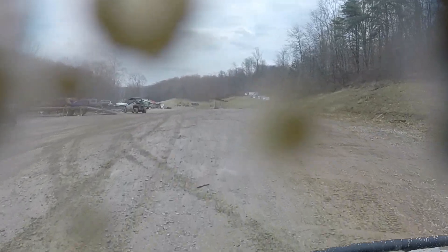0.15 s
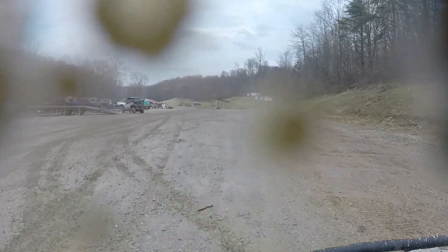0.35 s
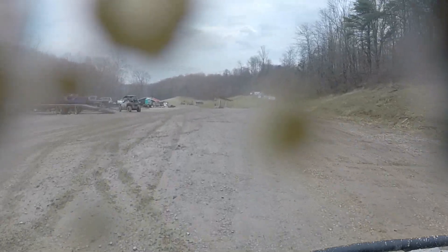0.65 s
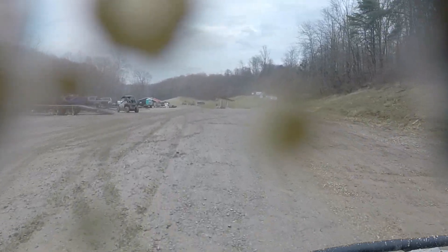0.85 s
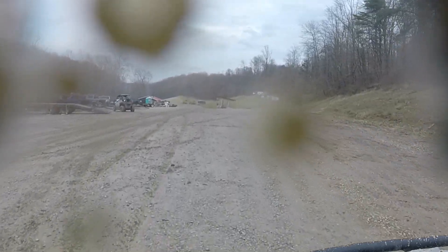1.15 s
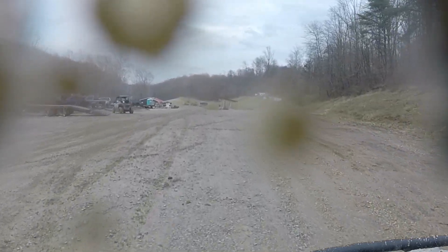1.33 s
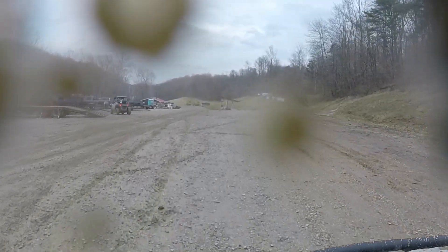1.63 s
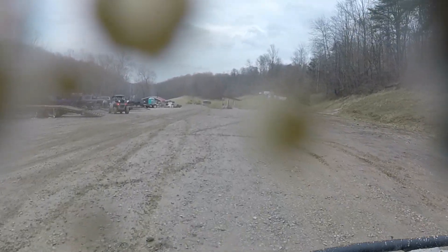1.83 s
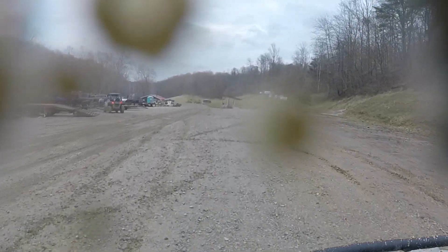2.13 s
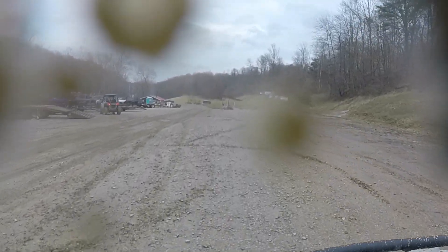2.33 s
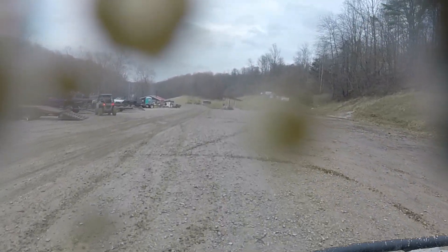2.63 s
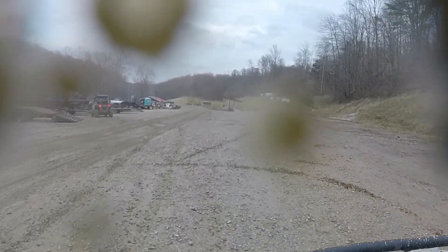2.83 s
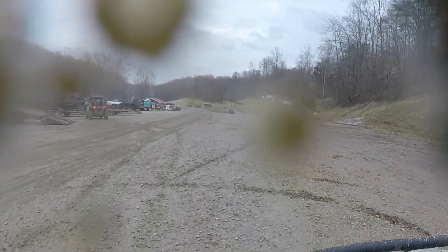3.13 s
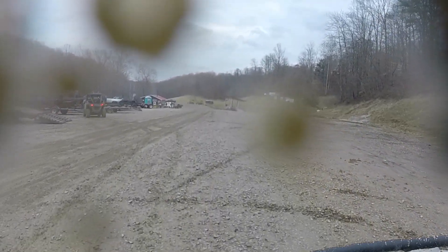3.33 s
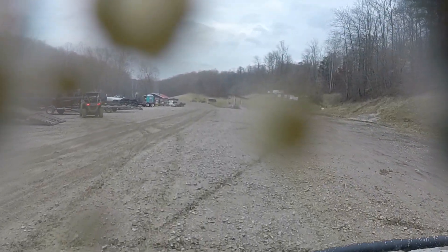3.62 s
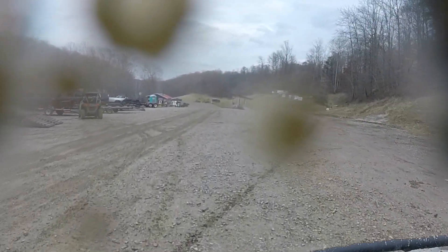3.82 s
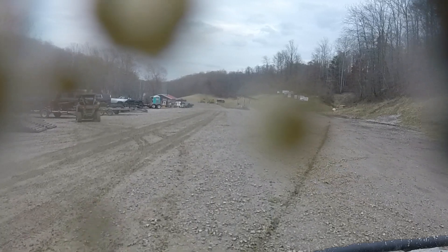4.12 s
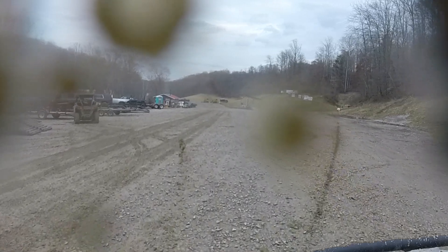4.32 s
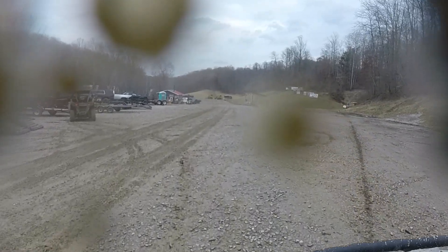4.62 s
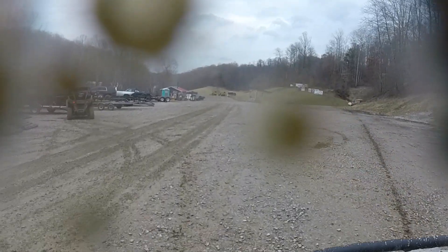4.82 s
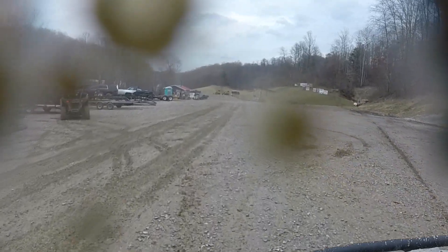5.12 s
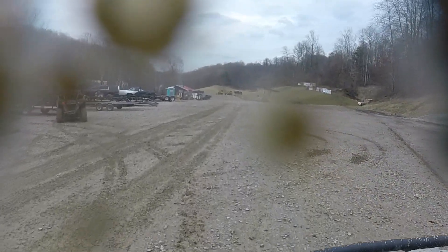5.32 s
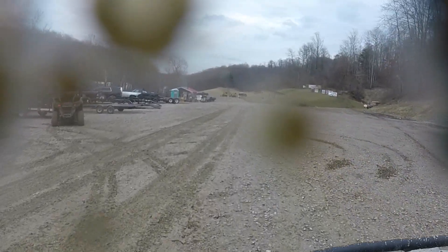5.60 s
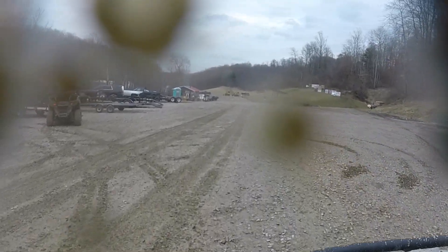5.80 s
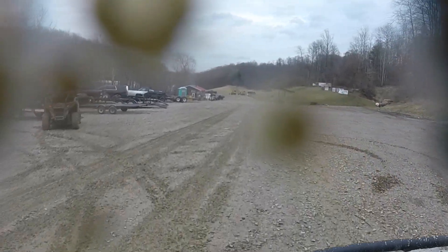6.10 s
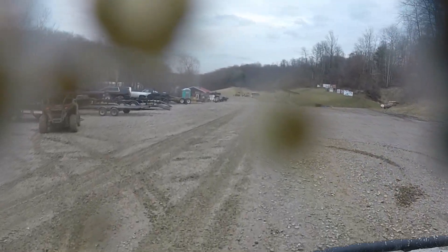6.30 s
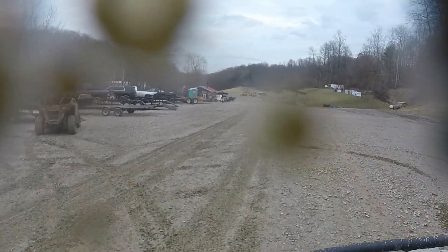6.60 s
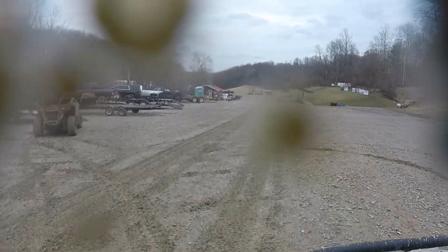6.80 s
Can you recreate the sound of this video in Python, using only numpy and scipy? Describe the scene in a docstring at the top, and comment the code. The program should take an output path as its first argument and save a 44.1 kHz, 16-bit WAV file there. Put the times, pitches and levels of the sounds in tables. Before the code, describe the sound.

Low boomy engine hum sinks in pitch over crunching gravel, with sparse stone knocks growing into a busy rattle of hits and grit.

```python
"""A slowing off-road vehicle on gravel, heard by a small microphone in a closed case on the bodywork.
Its exhaust booms as sines on crankshaft orders; a shaft and a panel add narrow noisy tones, loose metal puffs.
Tyres grind, rumble and crunch as shaped noise and random grains; grit ticks on the bodywork.
Thrown stones ring the modes of the underside, and a gain control ducks after the hardest knocks."""
import sys
import numpy as np
from scipy import signal
from scipy.fft import rfft, irfft, next_fast_len
from scipy.io import wavfile
from scipy.ndimage import uniform_filter1d

SR = 44100
rng = np.random.default_rng(int(sys.argv[2]) if len(sys.argv) > 2 else 0)


def waveform_to_disk(signal):
    """Save audio, clipped to [-1, 1], as 16-bit WAV at the path in sys.argv[1]."""
    frames = np.transpose(np.atleast_2d(signal))
    scaled = np.clip(frames, -1, 1) * 32767
    samples = np.round(scaled).astype(np.int16)
    wavfile.write(sys.argv[1], SR, samples)


N = 306495

# Engine, four firings a turn: t/s, firing rate f/Hz, mean level/dB of the firing order,
# mean level/dB of the crankshaft order above it
ENGINE_COURSE = [(0.0, 125.4, -14.5, -25), (0.08, 125.7, -9, -25.5), (.45, 125.5, -9, -26),
                 (1.39, 123.4, -11, -35), (2.59, 121, -10, -29.5), (3.0, 123, -9, -29),
                 (3.31, 125.1, -9.5, -25), (3.72, 122.4, -12, -36), (4.11, 116.9, -13, -26),
                 (4.45, 109.7, -11.5, -24), (4.62, 105.1, -19.5, -10), (4.8, 98.22, -18.5, -23.5),
                 (5.03, 101.4, -11.5, -15.5), (5.3, 97.57, -23.5, -18.5), (5.54, 94.56, -21, -27),
                 (5.7, 89.43, -26.5, -35), (5.82, 90.84, -15.5, -12.5), (6.0, 89.43, -22, -27),
                 (6.16, 88.1, -12, -24.5), (6.57, 88.25, -19.5, -9), (6.79, 88.46, -35, -15),
                 (6.95, 91.6, -13, -17)]
# Rolling on gravel: t/s, relative grinding level/dB, gain/dB of its part under 600 Hz,
# rumble level/dB, level/dB of the shaken panel
ROLLING_COURSE = [(0, -36.5, 1.5, -26.5, -44.5), (1.4, -38, 1, -23.5, -26.5),
                  (1.8, -34.5, -1.5, -24.5, -27.5), (3.05, -34, -2, -21, -28.5),
                  (3.5, -38.5, 3.5, -26, -41.5), (4.42, -38, -2, -18.5, -29.5), (4.66, -37, -2, -23, -18.5),
                  (4.85, -37, -3, -15.5, -18.5), (5.1, -36.5, -6, -20.5, -24),
                  (5.35, -31.5, -18, -17.5, -16), (5.62, -39, 8, -21, -22), (5.9, -36.5, -1.5, -18.5, -23),
                  (6.2, -35, -5.5, -17.5, -15), (6.5, -36.5, -0.5, -18.5, -12.5),
                  (6.95, -38.5, -3, -21.5, -32)]


def amp(db):
    """Level to amplitude ratio: 20 dB for each factor of ten."""
    return 10 ** (np.asarray(db) / 20)


def evened(x):
    """Normalisation to a root-mean-square value of 1."""
    return x / np.sqrt(np.mean(x ** 2) + 1e-20)


def read(points, hz):
    """Interpolation of a spectrum in level over logarithmic frequency."""
    f, value = np.transpose(points)
    return np.interp(np.log(hz + 1), np.log(f + 1), value)


def columns(rows):
    """Linear interpolation in time: every column after t/s, one value a sample."""
    s, *rest = np.transpose(rows)
    return [np.interp(np.arange(N) / SR, s, c) for c in rest]


def coloured(x, points):
    """Linear filtering: multiplies the spectrum of x by a gain curve of f/Hz, level/dB."""
    size = next_fast_len(len(x))
    gain = amp(read(points, np.fft.rfftfreq(size, 1 / SR)))
    return irfft(rfft(x, size) * gain, size)[:len(x)]


def wander(top_hz):
    """Low-pass random process: Gaussian roll-off around top_hz, rms 1."""
    count, rate_hz = 4096, 500
    steps = rng.standard_normal(count)
    hz = np.fft.rfftfreq(count, 1 / rate_hz)
    slow = irfft(rfft(steps) * np.exp(-(hz / top_hz) ** 2))
    return evened(np.interp(np.arange(N) / SR, np.arange(count) / rate_hz, slow))


def tone(hz, rough, rough_hz):
    """Phase integration of the curve hz: a sine mixed with narrow-band noise around it, rms near 1."""
    phase = 2 * np.pi * np.cumsum(hz) / SR + 2 * np.pi * rng.random()
    fuzz = wander(rough_hz) * np.cos(phase) + wander(rough_hz) * np.sin(phase)
    return np.sqrt(2 * np.clip(1 - rough ** 2, 0, 1)) * np.sin(phase) + rough * fuzz


def grains(rate, spread_db, cap):
    """Poisson-like impulses: mean rate/s, with exponentially distributed levels of at most cap * spread_db."""
    size = amp(spread_db * np.minimum(rng.exponential(1, N), cap))
    return size * (rng.random(N) < rate / SR)


def decay(count, t60_s):
    """Exponential decay: 60 dB lost in t60_s, cut off after count samples."""
    return amp(-60 * np.arange(count) / SR / t60_s)


def engine():
    """Order excitation: the firing order and the one above boom through the frame, among fainter orders."""
    # Faint orders under the boom: crankshaft order -> level/dB
    low_orders = {2: -31.5, 3: -36}
    # Cabin resonances that lift high orders passing through them: f/Hz, width/Hz, level/dB
    cabin_modes = [(364.4, 7.4, -38), (522.6, 26, -39.5)]
    hz, *levels_db = columns(ENGINE_COURSE)
    crank_hz = hz / 4
    flutter_db = 0.46 * wander(24)
    out = np.zeros(N)
    for order, db in zip((4, 5), levels_db):
        out += amp(db + flutter_db) * tone(order * crank_hz, rough=0.31, rough_hz=16.0)
    for order, db in low_orders.items():
        out += amp(db) * tone(order * crank_hz, rough=0.86, rough_hz=5.3)
    slowing = (hz / 125) ** 24.0  # high orders fade as the engine slows
    for order in range(11, 20):
        lift = sum(amp(db) * np.exp(-((order * crank_hz - f) / width) ** 2) for f, width, db in cabin_modes)
        out += lift * slowing * tone(order * crank_hz, rough=0.12, rough_hz=4.4)
    return out


def drive_shaft():
    """Rotating excitation: a beat that follows the shaft, broadened into narrow-band noise."""
    # Drive shaft: t/s, beat f/Hz, level/dB
    shaft_course = [(0, 40.9, -32), (.9, 40.8, -31), (3.1, 39.1, -26), (4.2, 37.15, -28.5),
                    (4.75, 34.7, -22.5), (4.95, 32.1, -33), (6.95, 33.2, -47)]
    hz, db = columns(shaft_course)
    return amp(db) * tone(hz, rough=0.91, rough_hz=4)


def body_panel():
    """Resonance under random excitation: bumps shake a panel, heard as narrow-band noise at 133 Hz."""
    panel_db = columns(ROLLING_COURSE)[-1]
    return amp(panel_db) * tone(np.full(N, 133), rough=.88, rough_hz=7)


def clatter():
    """Periodic impact: each firing shakes loose metal into a decaying noise puff, softer as the engine slows."""
    hz = columns(ENGINE_COURSE)[0]
    firings = np.cumsum(hz) / SR
    strength = amp(4.3 * rng.standard_normal(1000))[firings.astype(int)]  # some puffs are stronger
    puffs = strength * np.exp(-(firings % 1) / 0.21) * rng.standard_normal(N)
    # Metal: f/Hz, relative level/dB
    metal = [(500, -46.5), (900, -16.5), (1250, 9.0), (1500, -8.5), (2050, 6.0), (2450, 0.0),
             (2850, -13.0), (3400, -28.5), (8000, -30.0), (15000, -61)]
    return amp(-44.5) * (hz / 125) ** 2.4 * evened(coloured(puffs, metal))


def gravel_grind():
    """Granular contact noise: dense grains of unequal size over steady noise, swelling in clumps."""
    # Grinding spectrum: f/Hz, relative level/dB per Hz
    grind_spectrum = [(150, -26), (270, -4.5), (365, -3.5), (454, -5), (530, -5.5), (700, -14), (894, -9),
                      (1270, -16.5), (1460, -16.5), (2000, -16.5), (2400, -24.5), (2850, -24.5),
                      (3300, -37), (4300, -37.5), (5000, -48), (6500, -48), (8200, -49), (10000, -57),
                      (13000, -63), (16000, -82)]
    grind_db, low_db, _, _ = columns(ROLLING_COURSE)
    hits = grains(1200, spread_db=2.0, cap=5) * rng.choice([-1., 1.], N)
    rattle = rng.standard_normal(400) * decay(400, t60_s=0.022)  # each grain rattles for a moment
    bed = evened(signal.oaconvolve(hits, rattle)[:N]) + rng.standard_normal(N)
    clumps = amp(1.3 * wander(15.0))
    grind = evened(coloured(bed * clumps, grind_spectrum))
    low = signal.sosfilt(signal.butter(2, 600, fs=SR, output="sos"), grind)
    grind = grind + (amp(low_db) - 1) * low
    return amp(grind_db + 1.5) * grind


def gravel_rumble():
    """Random low-frequency excitation: shaped noise whose level wanders in lumps."""
    # Rumble spectrum: f/Hz, relative level/dB per Hz
    rumble_spectrum = [(14, -22), (24, -7.5), (70, 0), (105, 2.5), (140, 9.5), (165, 2.5), (190, -3),
                       (250, -11.5), (370, -29), (520, -14), (750, -38), (2000, -120)]
    rumble_db = columns(ROLLING_COURSE)[2]
    lumpy = rng.standard_normal(N) * amp(0.82 * wander(3.8))
    return amp(rumble_db) * evened(coloured(lumpy, rumble_spectrum))


def grit_ticks():
    """Shot noise: grit thrown up strikes the bodywork at random, each tick a short rattle."""
    # Grit: t/s, mean rate/(ticks per s)
    grit_course = [(0, 12), (4.4, 24), (4.7, 100), (5.6, 160), (6.95, 88)]
    hits = grains(columns(grit_course)[0], spread_db=1.0, cap=4)
    rattle = rng.standard_normal(900) * decay(900, t60_s=0.11)
    # Bodywork: f/Hz, relative level/dB
    bodywork = [(800, -45.0), (2500, -0.5), (4300, -7.0), (8000, -13.0), (11000, -23.0), (15000, -52.5)]
    return amp(-63) * evened(coloured(signal.oaconvolve(hits, rattle)[:N], bodywork))


def crunch():
    """Fracture noise: single stones of very unequal size crack under the tread in decaying noise bursts."""
    # Cracking stones: t/s, mean rate/(cracks per s)
    crunch_course = [(0, 36), (4.4, 43), (4.65, 60), (5.1, 89), (5.45, 99), (5.65, 45), (6.95, 25)]
    cracks = grains(columns(crunch_course)[0], spread_db=1.7, cap=4)
    bursts = signal.oaconvolve(cracks, decay(1200, t60_s=0.028))[:N] * rng.standard_normal(N)
    # Crack spectrum: f/Hz, relative level/dB
    spectrum = [(250, -27), (500, 2), (800, 1.0), (1300, -0.5), (2100, -6.0), (2900, -3.5),
                (3500, -26.0), (8000, -39.5), (15000, -65.5)]
    return amp(-50) * evened(coloured(bursts, spectrum))


def stones():
    """Modal impact: each stone is a crack that rings the underside, then skips off in three quick bounces."""
    # Thrown stones, coloured by the spot they strike: t/s, peak level/dB ahead of the gain control,
    # spectral offsets/dB near 1 kHz, 2 kHz and 8 kHz, modes that sing out as (f/Hz, gain/dB)
    stone_hits = [(0.175, -32, 12, 5, -18.5, []), (0.2394, -27.5, 16, 9, -33, []),
                  (0.3212, -24.5, 18, 8, -26, []), (0.365, -21.5, -5, 14, -5, []),
                  (1.1846, -13.5, -5, 0.5, -9, [(2930, 12), (2040, -14), (3203, 5), (5480, 24),
                  (9100, 35)]), (2.1616, -21, 19, 13, -7, []), (3.0643, -22, 19, 5.5, -23, []),
                  (3.4205, -5, -1, -5.5, -17, [(1174, 6), (1432, 7), (2930, 4), (3700, 11), (3900, 19),
                  (4330, 13), (4700, 18), (2040, 4), (7700, 20.5)]), (3.9684, -26, -8, -1.5, -8, []),
                  (4.226, -27.5, -9, -1, -15, []), (4.596, -15, -8, -5, -52, []),
                  (4.609, -23, -5, 0.5, -35, []), (4.633, -38.5, 0, -6, 14, []),
                  (4.661, -22, 7.5, -2.5, -19, []), (4.7348, -28, -1, 9, -15, []),
                  (4.739, -34.5, 3, -4, 11, []), (4.764, -24.5, -11, -4, -1.5, [(2815, 21)]),
                  (4.8255, -36.5, -8, -7, 1, []), (5.1108, -19, -17, -5, -4, [(4330, 25), (3900, 20),
                  (4090, 29), (3203, 5)]), (5.116, -20.5, -4, -9, -28, [(2815, 20), (2283, 15)]),
                  (5.14, -22.5, 24, -2, -17, []), (5.147, -20, 8, -1, -12, []),
                  (5.162, -29, 10, -3, -3, []), (5.1878, -7.5, 0, 11, -1.5, [(2536, 17)]),
                  (5.202, -20.5, 32, -2, -20, []), (5.327, -20, 16, 0, -23, []),
                  (5.347, -36, -7, -9, 10, []), (5.379, -16.5, -8, -6, -1, [(2190, 27), (2800, 33),
                  (4090, 19)]), (5.385, -16.5, 9, -1, -16, [(2536, 17), (3440, 23)]),
                  (5.6344, 0, 2, 3, -14.5, [(904, 13.5), (1771, 12), (2089, 14.5), (5340, 17)]),
                  (5.7835, -30, 0, -25, -10, []), (5.816, -18.5, 11, -2, -29, []),
                  (6.008, -25.5, 0, -3.5, -13, []), (6.034, -29, 6, -17, -2, []),
                  (6.19, -31, -3, -14, 2, []), (6.214, -35, -13, -26, 8, []),
                  (6.399, -29, -2, -10, -7.5, [(4090, 22)]), (6.452, -31.5, 8, -2, 1, [])]
    # Modes of the underside: f/Hz, relative level/dB, decay time t60/s
    underside_modes = [(904, -6, .04), (1077, -6, .055), (1174, -9, .07), (1432, -10, .055),
                       (1771, -8, .022), (1900, 1, .016), (2040, 6, .018), (2089, -27, .18),
                       (2190, -18, .05), (2283, -14, .03), (2536, -14, .03), (2770, -30, .1),
                       (2815, -31, .16), (2930, -8, .015), (3203, -6, .022), (3440, -18, .05),
                       (3700, -16, .02), (3900, -18, .018), (4090, -26, .06), (4330, -16, .035),
                       (4700, -18, .016), (5340, -22, .075), (5480, -16, .03), (5950, -12, .018),
                       (7700, -16, .012), (9100, -14, .012)]
    crack_t60_s, scatter_db, scatter_t60_s = 0.023, -27.5, 0.25
    bounce_gap_s, bounce_loss_db = 0.0044, -14.5  # largest random gap, and change at each bounce
    length = 8192
    out, t = np.zeros(N + length), np.arange(length) / SR
    hz, db, t60 = (c[:, None] for c in np.transpose(underside_modes))
    crack_decay = amp(-60 * t / crack_t60_s) + amp(scatter_db - 60 * t / scatter_t60_s)
    rise = 1 - np.exp(-t / 0.0015)  # the blow spreads through the frame
    for s, peak_db, low_db, mid_db, high_db, sings in stone_hits:
        spot, phase, beat = rng.random((3, len(hz), 1))
        # Struck spot: f/Hz, relative level/dB
        colour = [(500, low_db - 32.5), (780, low_db - 8.5), (1150, low_db - 5.5), (2000, mid_db),
                  (2900, -0.5), (3600, high_db / 5 - 10), (5400, high_db / 2 - 10), (6600, high_db - 15),
                  (8000, high_db - 11.0), (11000, high_db - 26.0), (15000, high_db - 39.0)]
        sing_db = sum(gain_db * np.exp(-((f / hz - 1) / .02) ** 2) for f, gain_db in sings)
        ring_db = db + sing_db + read(colour, hz) + 6 * (spot - .5) - 60 * t / t60
        # each mode has a close twin and beats with it, at 35 to 105 Hz
        throb = 1 + .35 * np.cos(2 * np.pi * 70 * (.5 + beat) * t)
        ring = (amp(ring_db) * throb * np.sin(2 * np.pi * (hz * t + phase))).sum(0)
        crack = rise * coloured(rng.standard_normal(length), colour) * crack_decay
        knock = rise * amp(-13) * ring + crack
        delays_s = bounce_gap_s * (0.32 + rng.random(3).cumsum())
        for delay_s, change_db in zip(delays_s, bounce_loss_db * np.arange(1, 4)):
            late = round(delay_s * SR)
            knock[late:] += amp(change_db) * crack[:-late]
        at = round(s * SR)
        out[at:at + length] += amp(peak_db) * knock / abs(knock).max()
    return out[:N]


def scene():
    """Superposition: the sound pressures of all sources add."""
    vehicle = engine() + drive_shaft() + body_panel() + clatter()
    gravel = gravel_grind() + gravel_rumble() + grit_ticks() + crunch()
    return (vehicle + gravel + stones())[None]


def record(dry):
    """Dynamic compression: strong knocks above the boom pull the gain down, slow recovery; then a band limit."""
    knocks = signal.sosfilt(signal.butter(2, 600, "high", fs=SR, output="sos"), dry[0])
    power_db = 10 * np.log10(abs(uniform_filter1d(knocks ** 2, size=200)) + 1e-12)
    fall_db = np.arange(N) * 7.9 / SR  # recovers 7.9 dB a second
    wanted_db = 1.365 * (power_db + 16.0)  # reduction wanted above the -16 dB threshold
    held_db = np.maximum(np.maximum.accumulate(wanted_db + fall_db) - fall_db, 0)
    lag = np.exp(-1 / (.022 * SR))  # the gain follows with a 22 ms time constant
    ducked = dry / amp(signal.lfilter([1 - lag], [1, -lag], held_db))
    padded = np.pad(ducked, ((0, 0), (255, 255)), "reflect", reflect_type="odd")
    low_pass = signal.firwin(511, 15700, window=("kaiser", 9), fs=SR)  # band edge in Hz
    return signal.oaconvolve(padded, low_pass[None], "valid")


dry = scene()
out = record(dry)
waveform_to_disk(out)
```